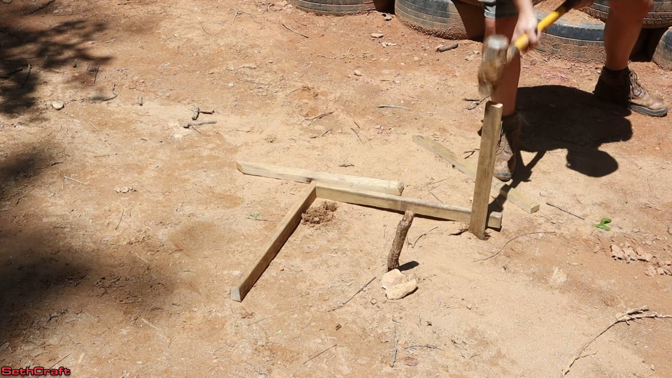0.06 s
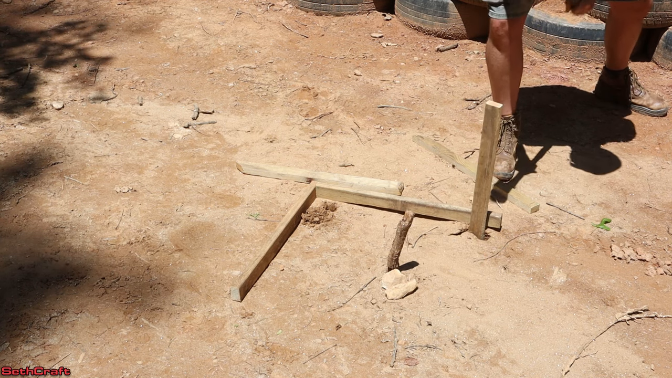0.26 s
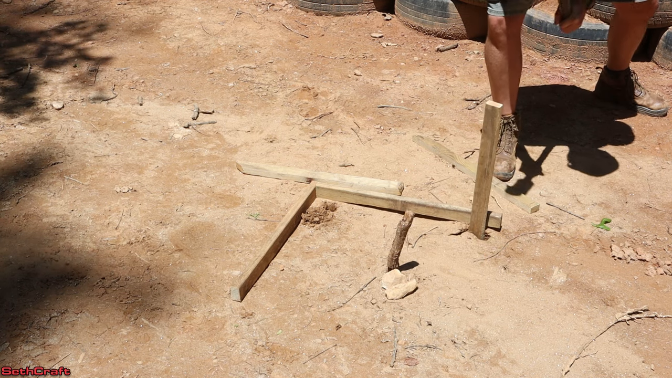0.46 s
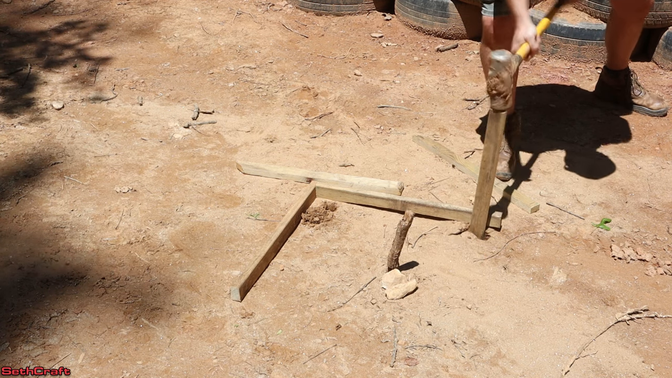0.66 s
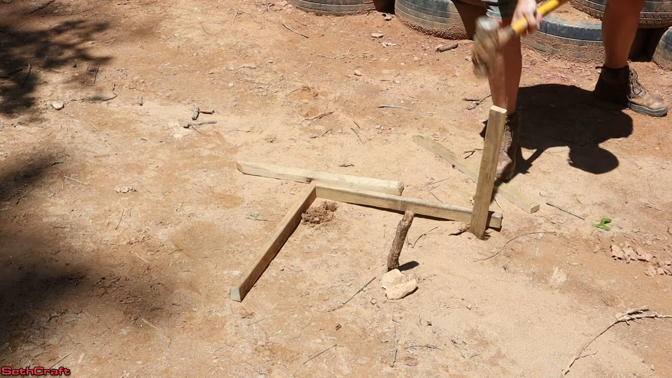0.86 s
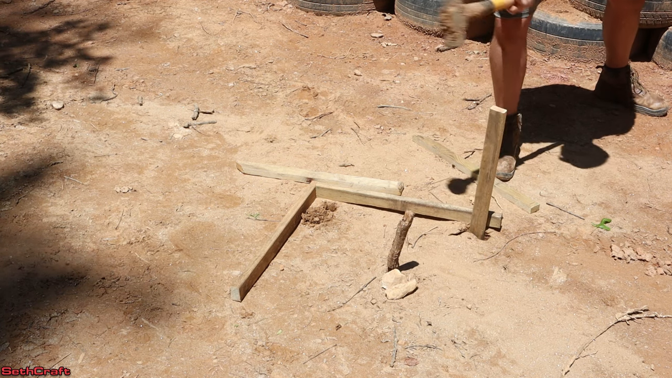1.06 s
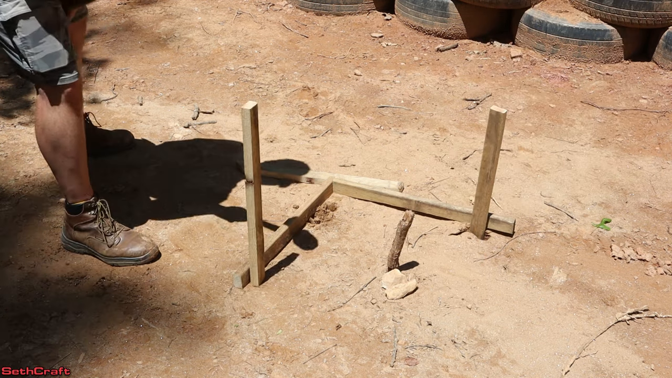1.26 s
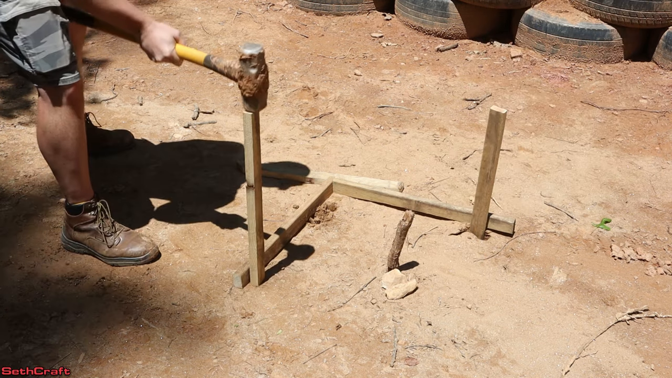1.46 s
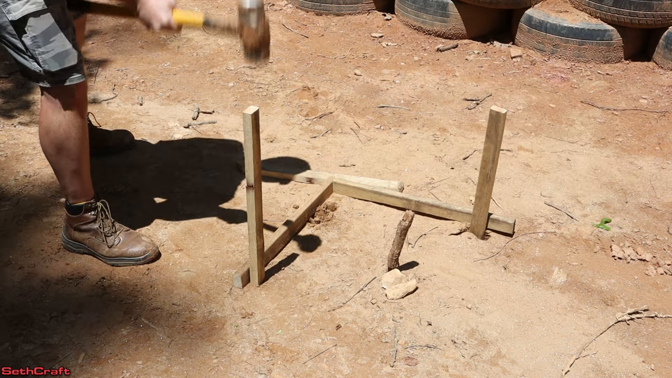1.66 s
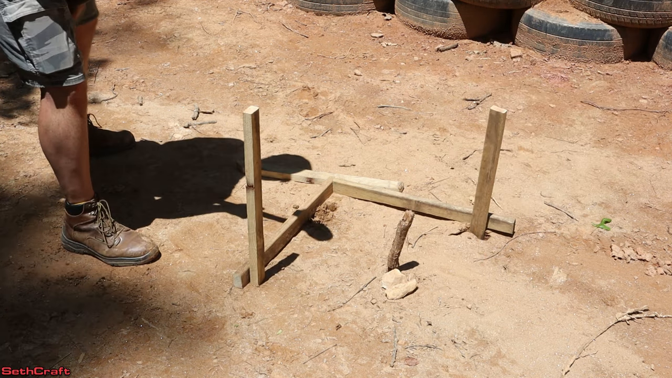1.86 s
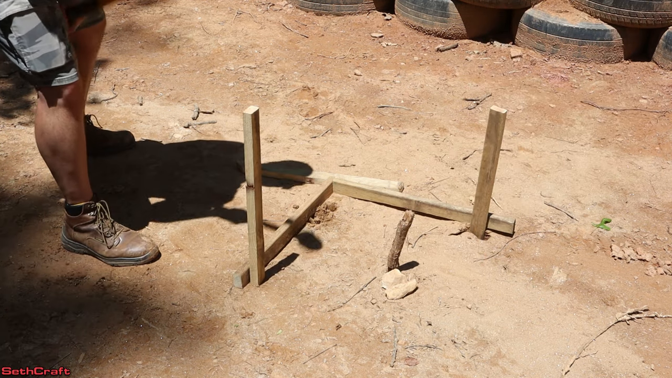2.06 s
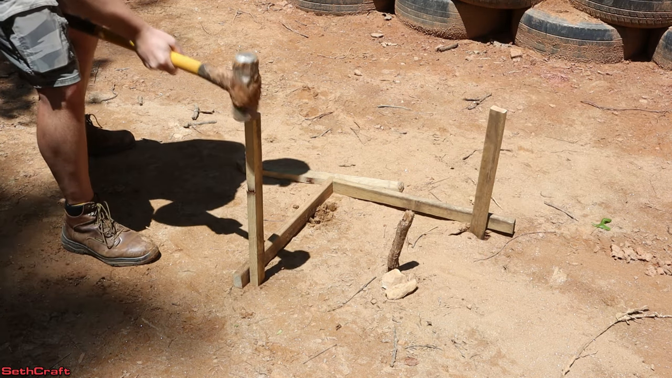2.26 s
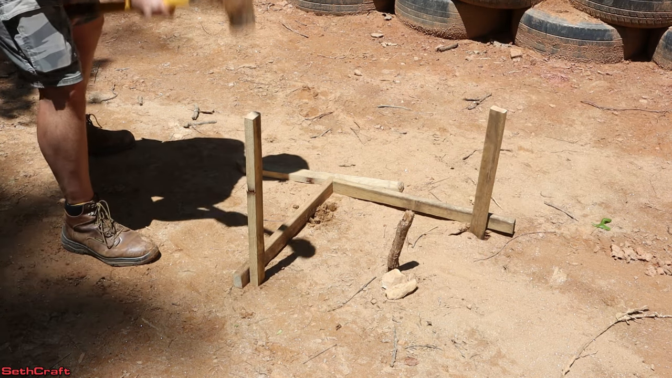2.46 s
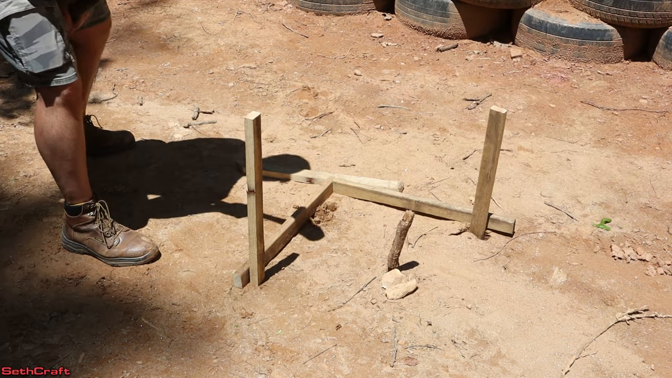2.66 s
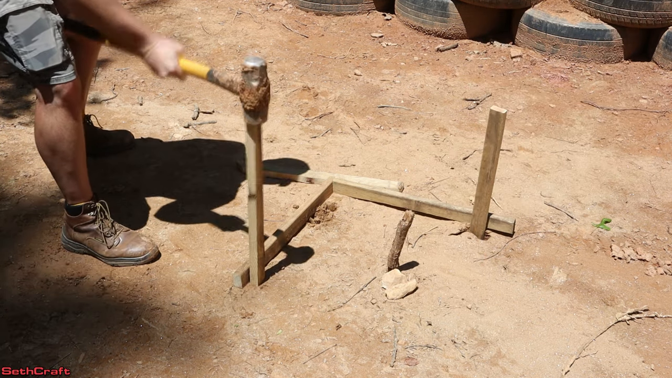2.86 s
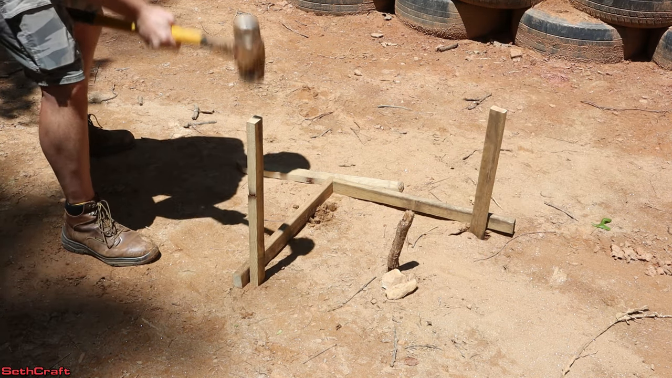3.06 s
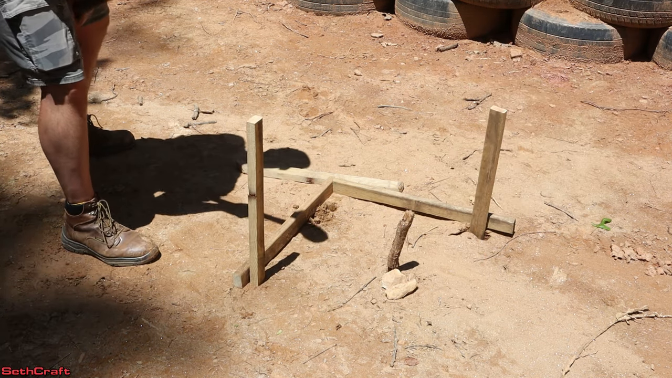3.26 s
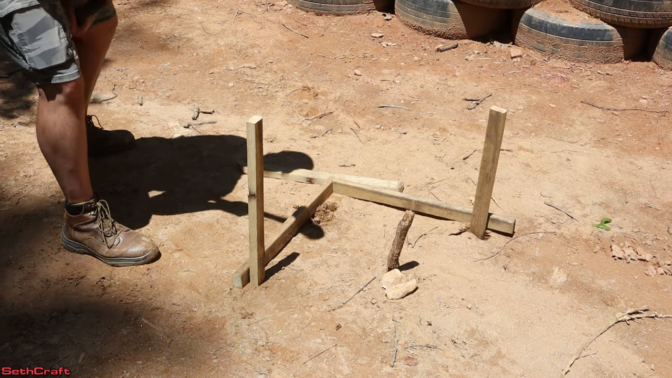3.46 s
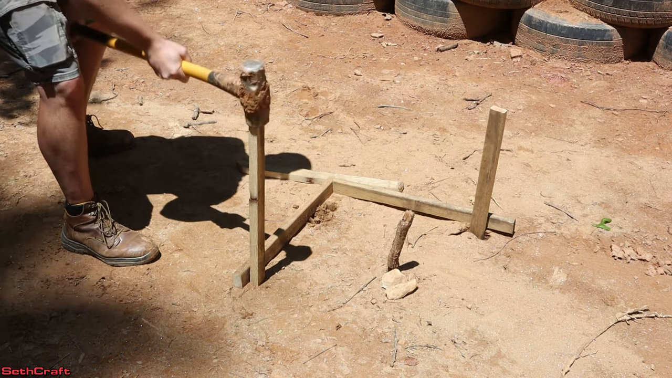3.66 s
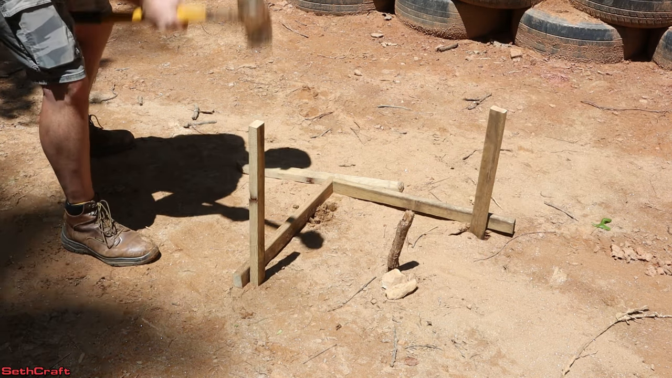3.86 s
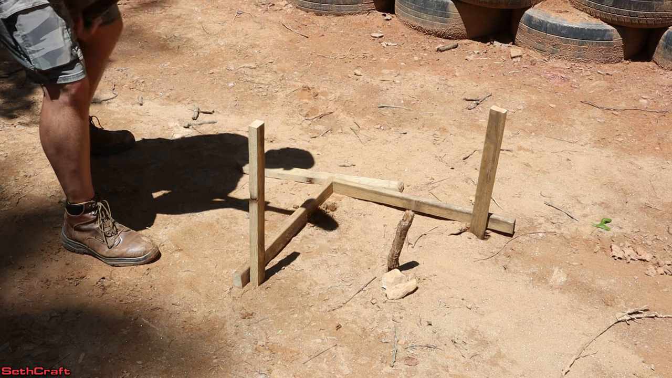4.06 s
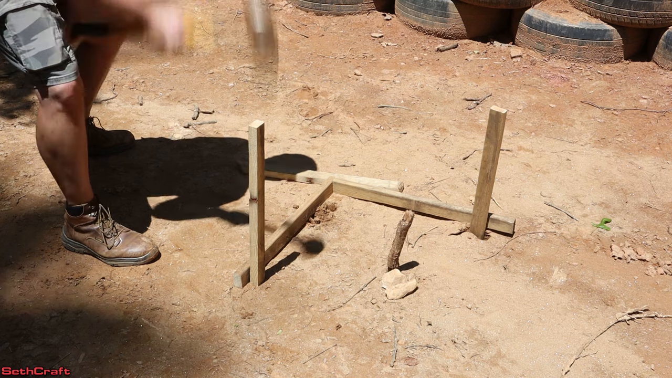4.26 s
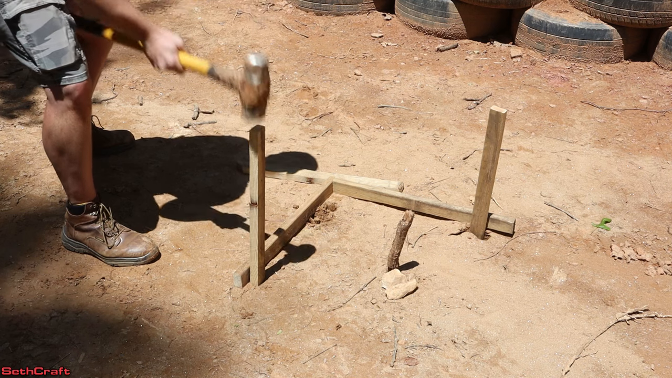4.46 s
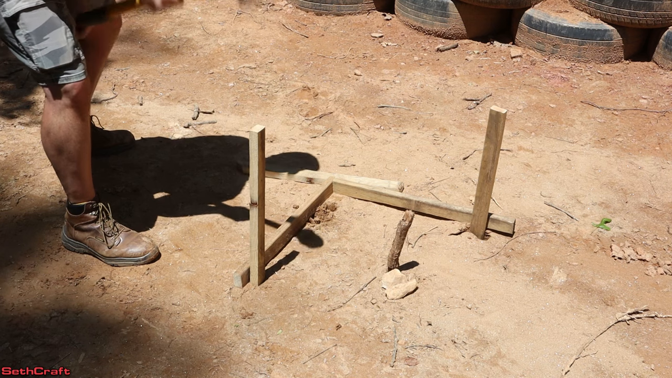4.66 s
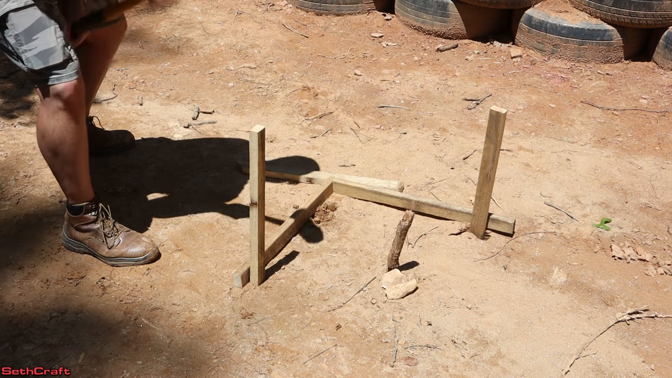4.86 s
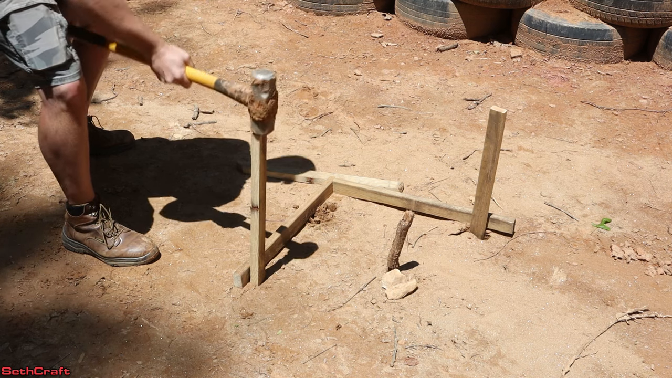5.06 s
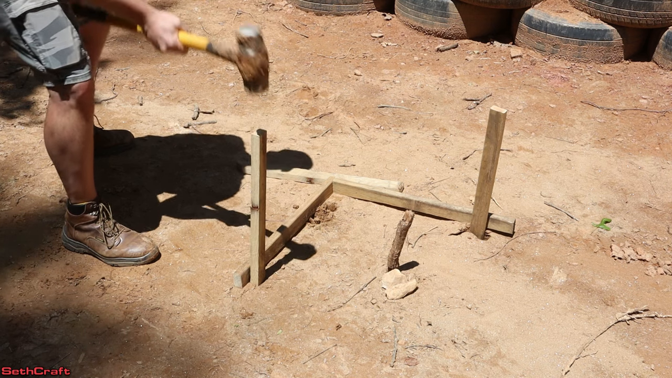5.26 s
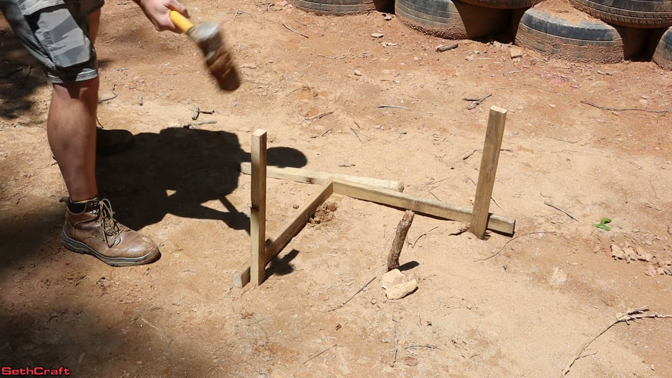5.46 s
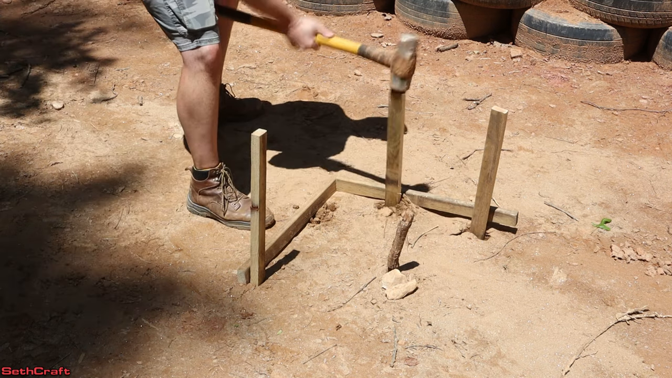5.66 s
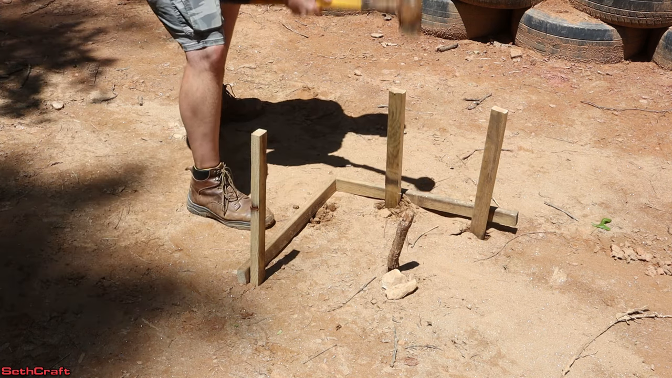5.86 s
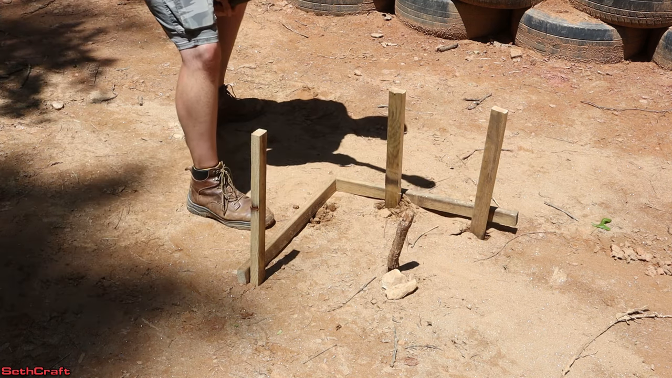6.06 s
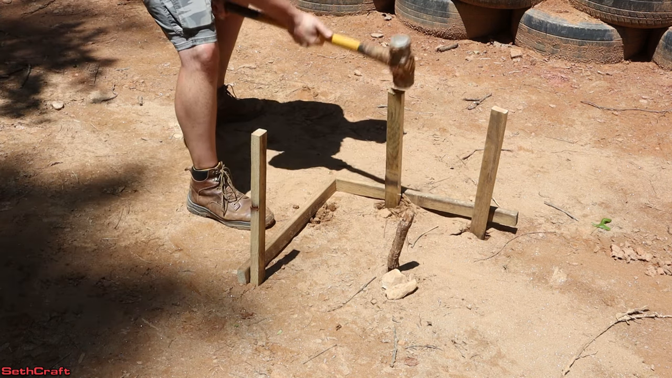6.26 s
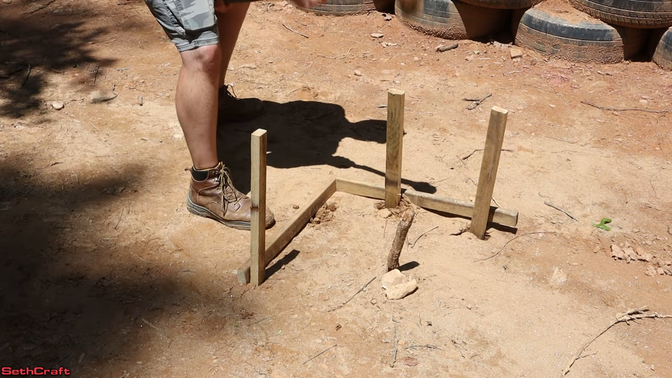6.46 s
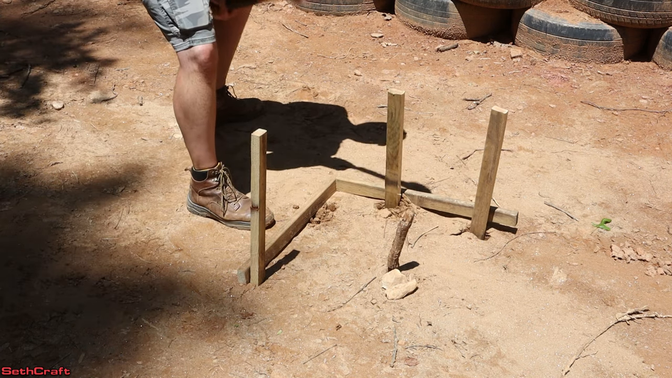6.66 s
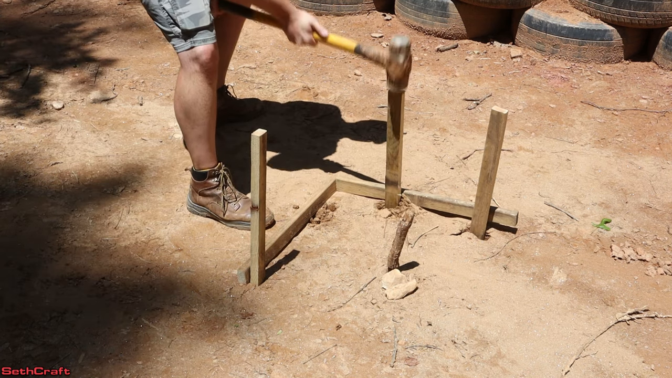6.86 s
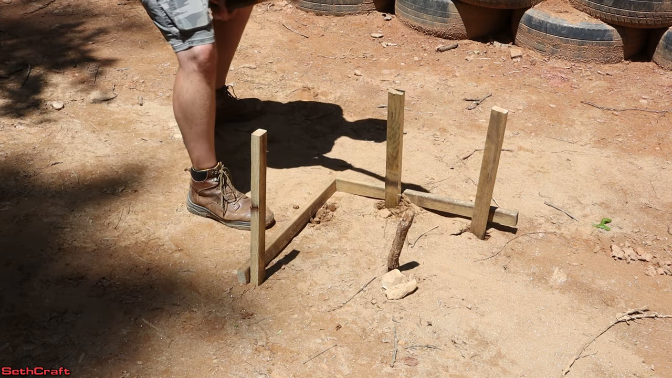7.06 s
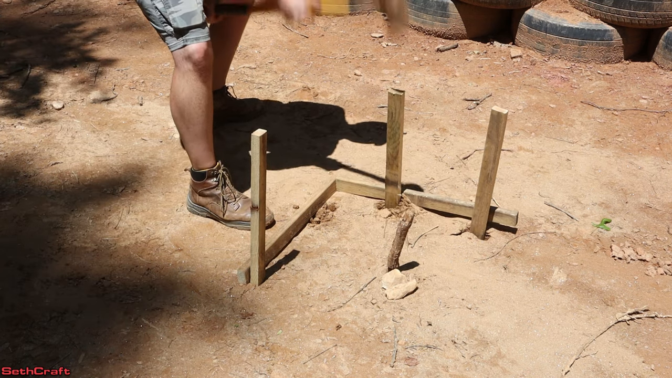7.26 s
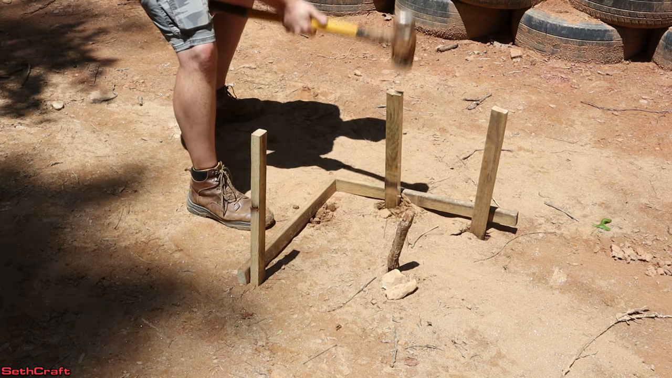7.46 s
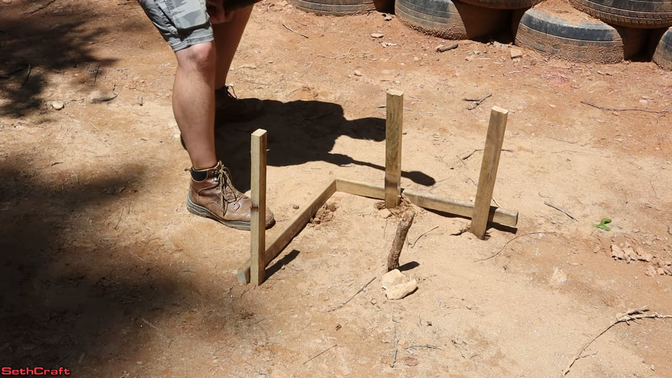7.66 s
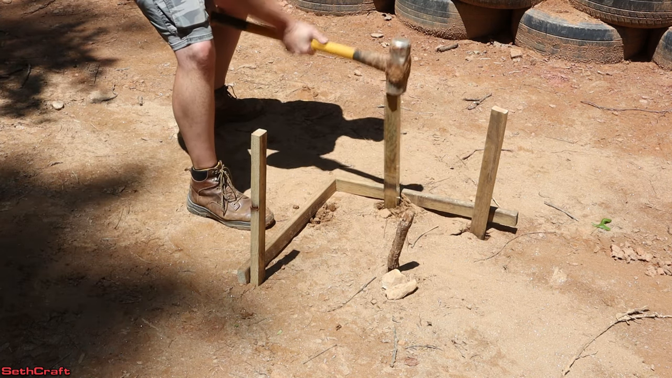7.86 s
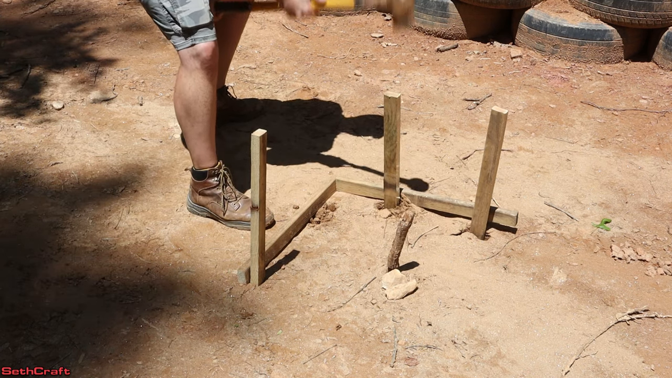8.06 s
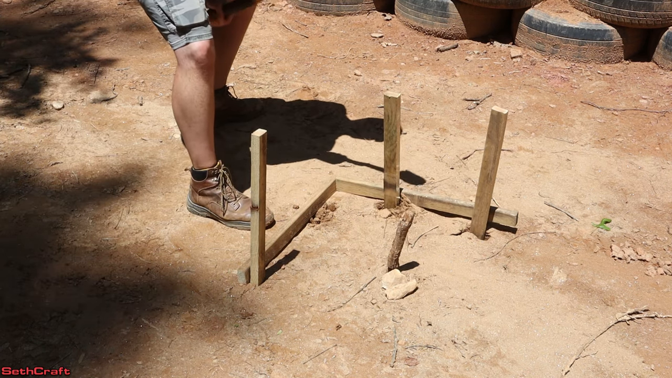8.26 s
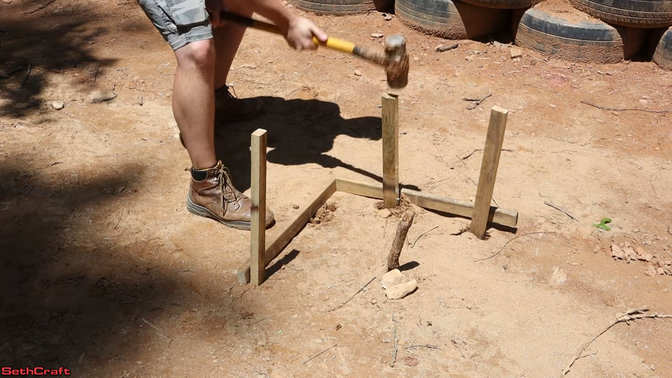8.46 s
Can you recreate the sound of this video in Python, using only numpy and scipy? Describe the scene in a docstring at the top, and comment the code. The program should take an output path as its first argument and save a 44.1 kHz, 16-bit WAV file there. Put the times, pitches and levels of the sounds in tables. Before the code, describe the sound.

Steady hammer blows crack on three wooden stakes in turn, clipping a fairly close microphone and scattering long, hissy echoes among trees. The first stake thuds low, the second is sharper and brighter, the third slightly softer and more hollow. Dull little knocks follow some hits. A quick bright hiss breaks off before the third stake, where knocks rattle, leaves rustle softly and a bird calls over quiet wind.

```python
"""A small sledgehammer drives three wooden stakes into hard ground in a clearing among trees.
Two blows, then six, then six: each is a short crack of ringing wood that overloads the microphone, a thud
through the ground and a long echo of filtered noise off the trees. Wind rumbles on the microphone over far air
and a low hum, and dull knocks follow some blows. A bright hiss swells and breaks off just before the third
stake; while that one goes in, knocks rattle, leaves rustle in two puffs and a bird calls in whistled glides."""
import sys
import numpy as np
from scipy import signal
from scipy.fft import rfft, irfft
from scipy.io import wavfile
from scipy.ndimage import uniform_filter1d

SR = 44100
rng = np.random.default_rng(int(sys.argv[2]) if len(sys.argv) > 2 else 0)


def makeup_ratio(level_db):
    """Linear amplitude ratio for a level in decibels (20 dB per factor of ten)."""
    decades = np.asarray(level_db, float) / 20
    return 10 ** decades


def waveform_to_disk(signal):
    """Save audio, clipped to [-1, 1], as 16-bit WAV at the path in sys.argv[1]."""
    frames = np.transpose(np.atleast_2d(signal))
    scaled = np.clip(frames, -1, 1) * 32767
    samples = np.round(scaled).astype(np.int16)
    wavfile.write(sys.argv[1], SR, samples)


N = 375408

# The hammer blows. Each row: start in seconds, strength in dB, spacing of the lengthwise rings in Hz, share of
# the wave sent back (0-1), main ring in Hz.
BLOWS = [(0.0496, 7, 1050, .3, 1089), (0.7349, 5, 1360, .2, 1256), (1.4995, 7.5, 735, 0.4, 2250),
         (2.243, 3.5, 700, 0.2, 1791), (2.9525, 8, 921, .35, 1930), (3.7001, 5.5, 748, .05, 1850),
         (4.3968, 3, 931, 0.3, 2017), (5.0802, 6.5, 945, .3, 1950), (5.75, 0.5, 616, .1, 1298),
         (6.3193, -4.5, 580, 0.3, 1452), (6.865, -5, 476, 0.06, 1090), (7.4186, -3, 950, 0.2, 934),
         (7.9535, -3.5, 933, 0, 912), (8.4958, -2.5, 774, 0.2, 1541)]
# The work at each stake. Each row: start in seconds, end in seconds, direct sound in dB,
# overload ceiling (full scale 1), frequency in Hz below which the echoes thin out.
STAKES = [(0, 1.25, -7, 0.3, 500), (1.249, 5.655, 2, 0.29, 1150), (5.654, 8.6, 0.5, 0.26, 750)]
# How each stake answers a blow of strength 0 dB. Each row: ring t60 in seconds, contact sharpness in Hz,
# ground thud in dB, change of the thud in dB per dB of strength.
ANSWERS = [(0.017, 3000, -26.5, -1.5), (0.0093, 2400, -47, -0.65), (0.014, 2800, -31, -2.19)]


def rms_one(x):
    """Scale to rms 1."""
    return x / np.sqrt(np.mean(x ** 2) + 1e-20)


def in_time(rows, count=N):
    """Join the rows of a curve by straight lines, one value a sample."""
    s, *columns = np.transpose(rows)
    return [np.interp(np.arange(count) / SR, s, column) for column in columns]


def at_hz(points, hz):
    """Read a spectrum on a log-frequency axis."""
    points = np.array(points)
    return np.interp(np.log(hz + 1), np.log(points[:, 0]), points[:, 1])


def coloured(spectrum):
    """Steady noise of the given spectrum, rms 1."""
    gain = makeup_ratio(at_hz(spectrum, np.fft.rfftfreq(N, 1 / SR)))
    return rms_one(irfft(rfft(rng.standard_normal(N)) * gain, N))


def drift(rate_hz):
    """Slow random wander of rms 1: noise through two equal one-pole smoothers."""
    r = np.exp(-2 * np.pi * rate_hz / SR)
    wander = signal.lfilter([1], [1, -2 * r, r * r], rng.standard_normal(N + SR))
    return rms_one(wander[SR:])   # the first second lets the filter settle


def filtered(x, order, hz, kind):
    """Butterworth filter."""
    return signal.sosfilt(signal.butter(order, hz, kind, fs=SR, output="sos"), x)


def ring(clicks, hz, t60):
    """A damped resonance: a unit click sets a sine of height about 1 ringing."""
    r, w = makeup_ratio(-60 / (t60 * SR)), 2 * np.pi * hz / SR
    return signal.lfilter([0, np.sin(w)], [1, -2 * r * np.cos(w), r * r], clicks + 1e-18)


def peak(t, s, top_db, rise_db_per_s, fall_db_per_s):
    """Level in dB that climbs to a top and falls away in straight lines."""
    return top_db - np.where(t < s, rise_db_per_s * (s - t), fall_db_per_s * (t - s))


def stake_of(s):
    """Number of the stake that is being driven at this time."""
    return sum(s >= stake[0] for stake in STAKES[1:])


def crack(spacing_hz, sent_back, ring_hz, further_peaks, t60, sharp_hz, chance):
    """One blow: a rough contact of about a millisecond runs up and down the stake and excites damped rings."""
    peak_spread_db = 3   # the further peaks differ a little in level from blow to blow
    lively_db = 21.5     # more wave sent back also throws more ring to the trees, dB per unit share
    t = np.arange(len(chance)) / SR
    body_hz = [0.44 * ring_hz, min(sharp_hz, 12000)]   # a blow carries little outside this band

    contact = .22 * chance * np.exp(-t / .0006)
    contact[:3] = -1     # the steel face lands first
    contact = filtered(contact, 2, body_hz, "band")

    trip = np.zeros(round(SR / spacing_hz) + 2)
    trip[-3:] = np.clip(sent_back, 0, .4) * np.array([.25, .5, .25])    # each trip dulls the wave
    once = np.arange(len(trip)) == 0
    wave = signal.lfilter(once + trip, once - 0.13 * trip, contact)    # the first return is the strongest

    first = ring(contact, ring_hz, t60)
    others = 0
    for (hz, db), luck in zip(further_peaks, chance[1000:]):
        others = others + makeup_ratio(db + peak_spread_db * luck) * ring(contact, hz, 0.85 * t60)

    # the head of the stake crushes for some milliseconds
    crush = filtered(chance[::-1] * np.exp(-t / 0.0015), 2, body_hz, "band")

    parts = np.array([wave, first + others, crush, first])
    parts = parts / np.sqrt(np.sum(parts ** 2, axis=1, keepdims=True))   # equal energy
    parts[-1] *= makeup_ratio(lively_db * sent_back)
    return parts


def steel_ticks(chance):
    """The bright tick of steel on end grain: a fraction of a millisecond of random signs at each blow."""
    tick_db, follows, decay_s = -26.5, .3, .0003   # level before the filter; dB per dB of strength
    decay = np.exp(-np.arange(200) / SR / decay_s)
    ticks = np.zeros(N)
    for (s, strength_db, *_), row in zip(BLOWS, chance):
        level = makeup_ratio(tick_db + follows * strength_db)
        ticks[round(s * SR):][:200] = level * np.sign(row[300:500]) * decay
    return filtered(ticks, 1, [3000, 17000], "band")


def echo_envelope(near, peak_s, peak_db, tail_db):
    """Strength of the echoes over three quarters of a second: near things, trees, far tail."""
    t = np.arange(SR * 3 // 4) / SR
    parts = [peak(t, s, db, 8999.5, 1302) for s, db in near]
    parts.append(peak(t, peak_s, peak_db, 89.5, 127.5))   # swell and fall of the trees
    parts.append((tail_db - 42.5 * t) - 1000 * (t < peak_s))   # the tail starts at the peak
    strength = np.sqrt(np.sum(makeup_ratio(np.array(parts)) ** 2, axis=0))
    return strength * (t > .004)   # nothing returns in the first 4 ms


def clearing(envelope):
    """Response of the trees: noise under the echo envelope, each half octave fading at its own rate."""
    # Echoes of the clearing by band, losses in air and leaves. Each row: frequency in Hz,
    # colour in dB, change of level in dB per second on top of the envelope.
    bands = np.array([(300, -10, -58.5), (700, -2, -33.5), (1110, -3.5, -18.5), (1850, -1.5, -4),
                      (2980, -3.5, 3.5), (5000, 2.5, -8), (8000, 1.5, -51.5), (14000, -2, -105)])
    t, out = np.arange(len(envelope)) / SR, 0
    for hz in 250 * 2. ** np.arange(0, 6.5, .5):
        noise = filtered(rng.standard_normal(len(t)), 2, [hz / 2 ** .25, hz * 2 ** .25], "band")
        fade_db = at_hz(bands, hz) + at_hz(bands[:, ::2], hz) * t
        out = out + noise * makeup_ratio(fade_db)
    return out * envelope


def hammering():
    """Cracks with their echoes; the rings face the microphone, the trees get more of the broad wave."""
    # Further ring peaks of the direct sound, one list a stake. Each row: frequency in Hz, drive in dB against
    # the main ring.
    ring_peaks = [
        [(2700, -6), (3200, -0.5), (4100, -10)],
        [(1300, -14.5), (2250, -5.5), (2750, -1)],
        [(860, -9), (1420, 3.5), (2000, -8.5)],
    ]
    # Single echoes of things near the stake, one list a stake. Each row: delay in seconds, level in dB.
    near_echoes = [
        [(.004, -55.5), (.0115, -50.5)],
        [(.004, -57.5), (.012, -52), (.0335, -57.5)],
        [(.0085, -39.5), (.032, -55)],
    ]
    # The trees round each stake. Each row: peak in seconds, peak level in dB,
    # far tail in dB extended back to 0 s.
    tree_echoes = [(.065, -66, -75), (.085, -61, -66), (0.045, -61.5, -72)]
    near_db = np.array([1.5, 8.0, 5.0])   # wave, rings, crush
    far_db = np.array([15.5, -5.5])       # wave, main ring
    far_tick_db, sharper_hz_per_db = 12.5, 114

    blows, out = np.zeros((4, N + SR)), np.zeros(N)
    chance = rng.standard_normal((len(BLOWS), 2048))
    for (s, strength_db, *stake), row in zip(BLOWS, chance):
        number = stake_of(s)
        t60, sharp_hz = ANSWERS[number][:2]
        sharp_hz = sharp_hz + sharper_hz_per_db * strength_db
        sound = crack(*stake, ring_peaks[number], t60, sharp_hz, row)
        blows[:, round(s * SR):][:, :len(row)] += makeup_ratio(strength_db) * sound

    ticks = steel_ticks(chance)
    near = makeup_ratio(near_db) @ blows[:3, :N]
    far = makeup_ratio(far_db) @ blows[::3, :N] + makeup_ratio(far_tick_db) * ticks

    t = np.arange(N) / SR
    for (start, end, direct_db, _, thin_hz), echoes, trees in zip(STAKES, near_echoes, tree_echoes):
        here = (t >= start) & (t < end)      # echoes of one stake stop where work on the next begins
        outward = filtered(far * here, 2, thin_hz, "high")
        returned = signal.fftconvolve(outward, clearing(echo_envelope(echoes, *trees)))[:N]
        out += here * (makeup_ratio(direct_db) * near + ticks + returned)
    return out


def thuds():
    """The ground wave arrives a little after the crack, rocks the soil, then slowly sways the microphone stand."""
    # Resonances of the ground. Each row: frequency in Hz, drive in dB, t60 in seconds.
    ground = [(118, 3.5, 0.062), (171, -11, 0.055)]
    # Sway of the microphone stand. Each row: frequency in Hz, drive in dB, t60 in seconds.
    stand_modes = [(30.3, -46, 0.52), (61, -40.5, 0.3), (96, -48, 0.37)]
    swell_t60_s = .15   # the sway builds up before it dies away
    at = np.array([round((blow[0] + 0.0057) * SR) for blow in BLOWS])
    push, even = np.zeros(N), np.zeros(N)
    thud_db, per_db = np.transpose([ANSWERS[stake_of(blow[0])][2:] for blow in BLOWS])
    push[at] = -makeup_ratio(thud_db + per_db * np.array(BLOWS)[:, 1])
    even[at] = makeup_ratio(rng.normal(0, 0.63, len(at)))   # the stand is pushed about evenly by every blow

    soil = sum(makeup_ratio(db) * ring(push, hz, t60) for hz, db, t60 in ground)
    settle = makeup_ratio(-60 / (.16 * SR))     # loose earth rumbles on as it settles
    soil += makeup_ratio(2.0) * signal.lfilter([1], [1, -settle], push) * rng.standard_normal(N)
    soil = filtered(soil, 2, [70, 400], "band")

    stand = sum(makeup_ratio(db) * (ring(even, hz, t60) - ring(even, hz, swell_t60_s)) for hz, db, t60 in stand_modes)
    stand = np.r_[np.zeros(round(.035 * SR)), stand][:N]   # 35 ms later still
    return soil + filtered(stand, 2, 110, "low")


def dull_knocks():
    """Dull knocks, clicks that ring three short resonances and repeat twice, each time weaker."""
    # Some follow a blow by about 56 ms like an echo, others rattle beside the third stake.
    # Each row: start in seconds, strength of the first click in dB.
    knock_rows = [(1.106, -49.5), (1.555, -30.5), (2.302, -36), (3.755, -39.5), (4.451, -34.5),
                  (5.137, -33.5), (6.869, -17), (6.883, -17.5), (6.8853, -19.5), (6.8926, -24.5)]
    repeat_s, repeat_loss_db = 0.022, 12
    clicks = np.zeros(N)
    for k in range(3):
        at = [round((s + k * repeat_s) * SR) for s, db in knock_rows]
        clicks[at] += makeup_ratio(np.array(knock_rows)[:, 1] - k * repeat_loss_db)
    knocks = ring(clicks, 690, 0.0051) + 0.66 * ring(clicks, 1095, 0.0057) + .5 * ring(clicks, 230, 0.013)
    return filtered(knocks, 3, 1900, "low")


def bird():
    """Whistled glides, sines of moving pitch, with a thin smear of echoes."""
    # The call, one list a note. Each row: time in seconds, pitch in Hz, rms level in dB.
    notes = [
        [(7.12, 3350, -77), (7.135, 3550, -80), (7.147, 3700, -80)],
        [(7.15, 2620, -83), (7.175, 2700, -73), (7.195, 3300, -76.5), (7.21, 4240, -66.5), (7.225, 4520, -73),
         (7.245, 3900, -75), (7.275, 3720, -71), (7.285, 3760, -82)],
        [(7.21, 4570, -78), (7.22, 5000, -79.5), (7.228, 5120, -75)],
        [(7.32, 2400, -75), (7.34, 3077, -64), (7.352, 3130, -72), (7.365, 2554, -68), (7.372, 3390, -68),
         (7.385, 3376, -63), (7.394, 3564, -70.5), (7.404, 2900, -63), (7.425, 2720, -65)],
    ]
    out, t = np.zeros(N), np.arange(N) / SR
    for note in notes:
        hz, level_db = in_time(note)
        hz = uniform_filter1d(hz, size=100)   # rounds the corners of the glide
        sounding = (t > note[0][0]) * (t < note[-1][0])
        out += np.sqrt(2) * makeup_ratio(level_db) * np.sin(2 * np.pi * np.cumsum(hz) / SR) * sounding
    smear = rng.standard_normal(SR // 4) * makeup_ratio(-33 - 200 * t[:SR // 4])
    return out + signal.fftconvolve(out, smear)[:N]


def leaves():
    """Leaves near the third stake: a calm rustle of coloured noise, raised by puffs of wind."""
    # Puffs of wind in the leaves. Each row: time in seconds, peak level in dB.
    puff_rows = [(7.05, -77.5), (7.89, -77)]
    calm_db = -86
    t = np.arange(N) / SR
    rustle = coloured([(2400, -26), (3300, -6), (4200, -7.5), (5200, -17.5), (6500, -27)])
    puffs = sum(makeup_ratio(peak(t, s, db, 94.5, 67)) for s, db in puff_rows)
    return rustle * (makeup_ratio(calm_db) + puffs) * (t > STAKES[-1][0])


def hiss():
    """A brief bright hiss of noise swells, then breaks off."""
    end_s, level_db, swell_s = 5.654, -65, 0.031
    t = np.arange(N) / SR
    swell = np.clip(1 - (end_s - t) / swell_s, 0, 1) * (t < end_s)
    return makeup_ratio(level_db) * swell * coloured([(3000, -20), (7000, -3), (12000, 2), (16000, -3)])


def wind():
    """Lumpy wind on the microphone: two coloured noises under a drawn level that wanders at random."""
    # Course of the wind. Each row: time in seconds, mean level in dB, share of the deeper rumble (0-1).
    course = [(0, -56, 0.87), (.45, -61, 0.82), (.7, -58, 0.55), (1.24, -61.5, 0.5), (1.26, -64, .3),
              (1.6, -65.5, 0.32), (2.1, -67.5, 0.25), (2.6, -65, 0.05), (2.95, -68.5, 0.3),
              (4.1, -65, 0.25), (4.6, -70, .3), (5.3, -68.5, 0.3), (5.65, -61, 0.1), (5.66, -73.5, 0.23),
              (6.6, -74, 0.7), (8.5, -76, 0.3)]
    # Spectrum of the lighter wind. Each row: frequency in Hz, relative density in dB per Hz.
    light_colour = [(150, -23), (250, -6), (320, -1.5), (430, -9), (600, -11), (1000, -38.5)]
    # Spectrum of the deeper rumble. Each row: frequency in Hz, relative density in dB per Hz.
    deep_colour = [(90, -15), (150, 2), (200, 2.5), (300, -11.5), (450, -18), (900, -45.5)]
    level_db, deep = in_time(course)
    deep = np.clip(deep, 0, 1)
    rumble = np.sqrt(deep) * coloured(deep_colour) + np.sqrt(1 - deep) * coloured(light_colour)
    return rumble * makeup_ratio(level_db + 2.2 * drift(12))


def far_air():
    """Steady far air of the place: coloured noise at -69 dB rms."""
    # Spectrum of the air. Each row: frequency in Hz, relative density in dB per Hz.
    air_colour = [(41, -29), (70, -2), (183, -16), (398, -26.5), (560, -23), (754, -18.5), (1020, -16),
                  (1280, -20.5), (2310, -24), (2650, -24), (4380, -31.5), (14700, -40.5), (16500, -48.5)]
    return makeup_ratio(-69) * coloured(air_colour)


def hum():
    """A faint low hum: one sine of 47.4 Hz whose level wanders about -69 dB rms."""
    level = np.sqrt(2) * makeup_ratio(-69 + 1.1 * drift(6))
    return level * np.sin(2 * np.pi * 47.4 * np.arange(N) / SR)


def scene():
    """All sources at one microphone."""
    background = leaves() + hiss() + wind() + far_air() + hum()
    return (hammering() + thuds() + dull_knocks() + bird() + background)[None]


def band_limit(x):
    """A steep low-pass at the top of the band."""
    return signal.sosfilt(signal.butter(12, 16820, fs=SR, output="sos"), x)


def record(dry):
    """The microphone input flattens whatever rises above its ceiling, which is set for each stake."""
    t = np.arange(N) / SR
    ceiling = sum(top * ((t >= start) & (t < end)) for start, end, _, top, _ in STAKES)
    return band_limit(np.clip(dry, -ceiling, ceiling))


dry = scene()
out = record(dry)
waveform_to_disk(out)
```